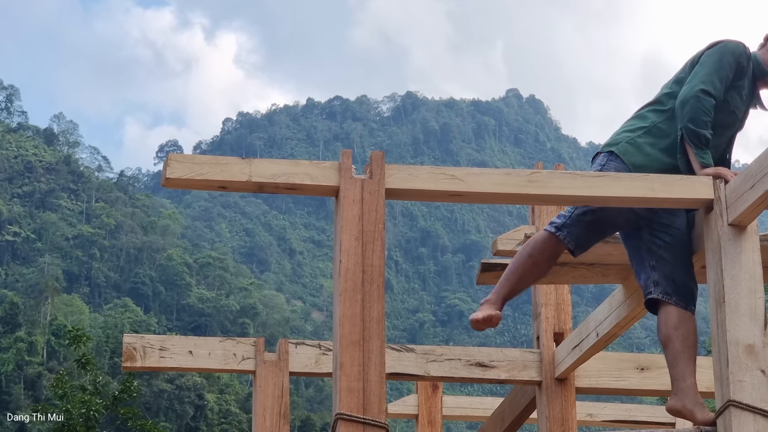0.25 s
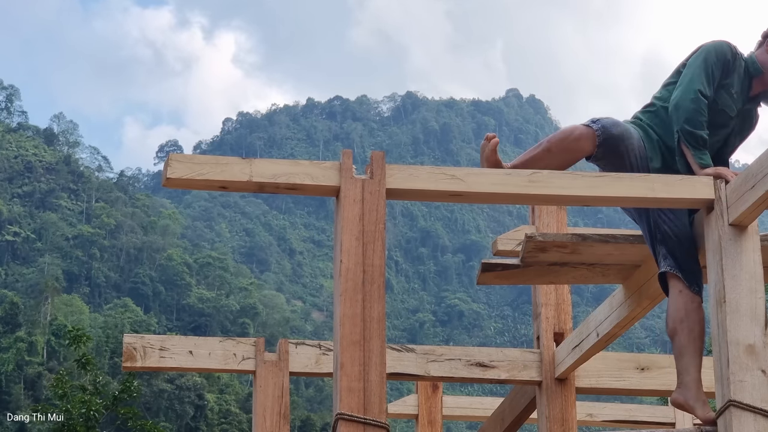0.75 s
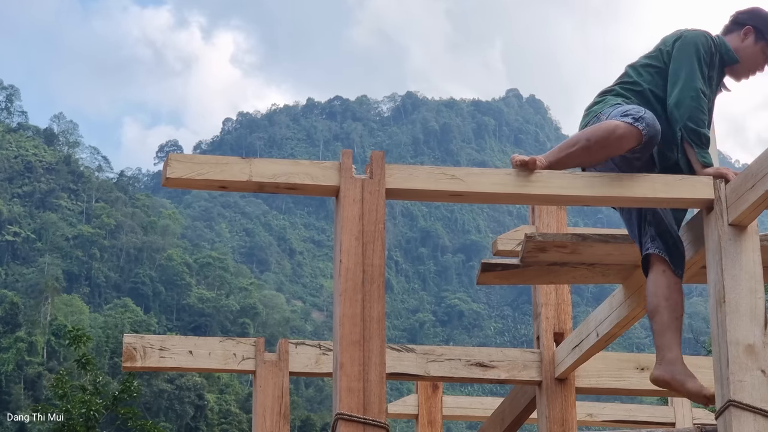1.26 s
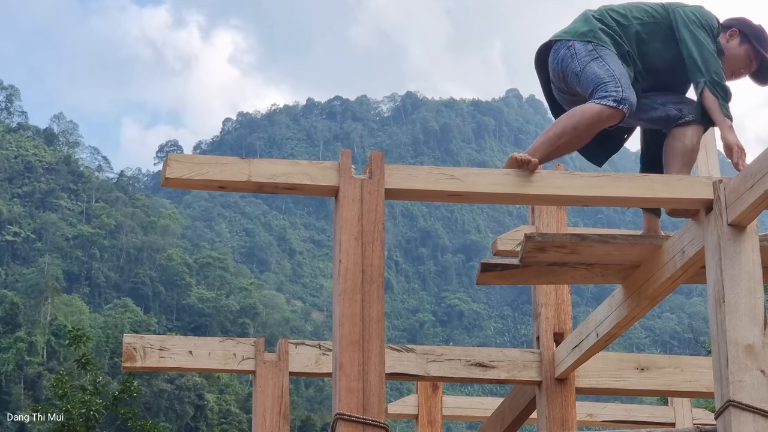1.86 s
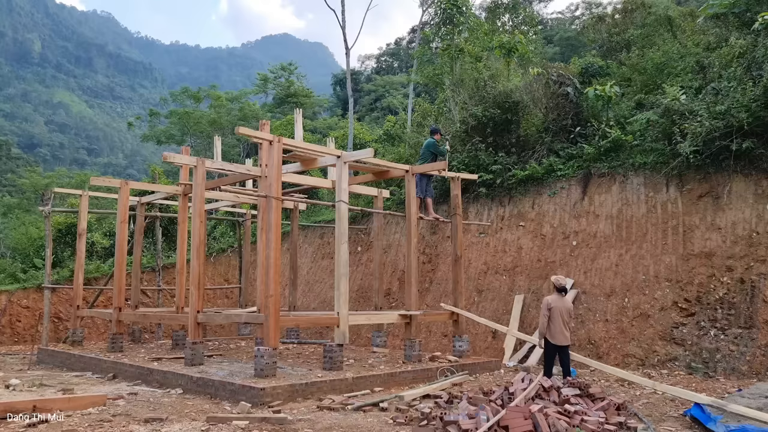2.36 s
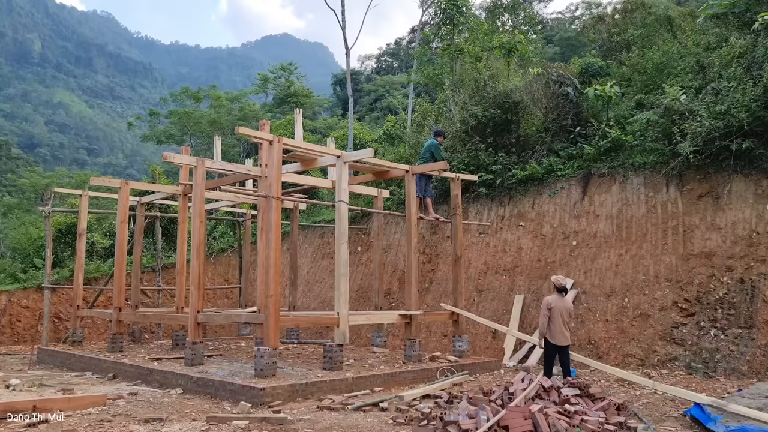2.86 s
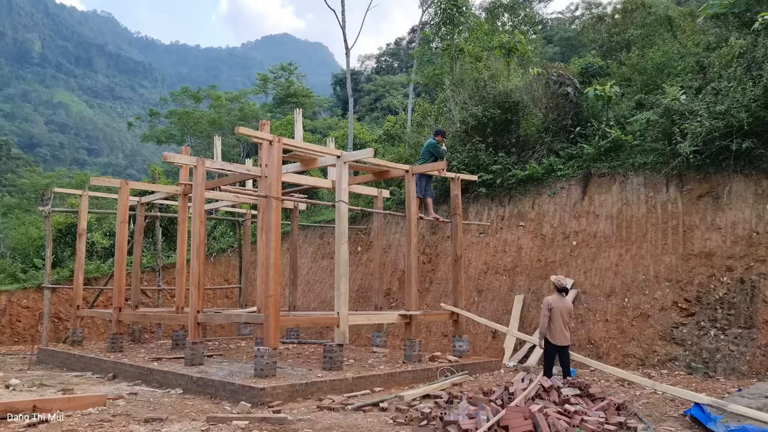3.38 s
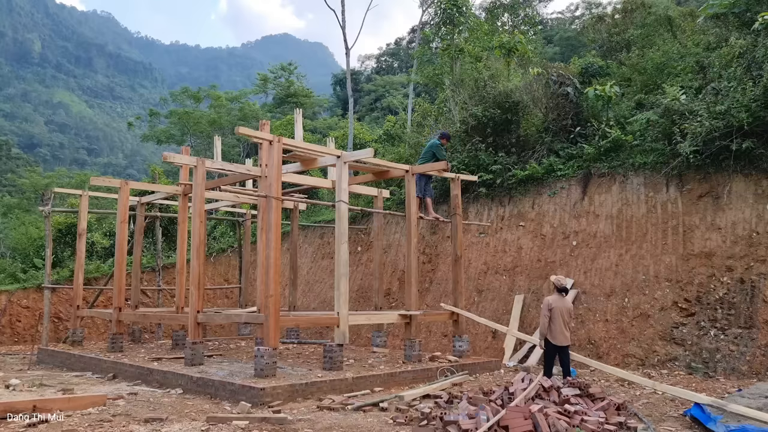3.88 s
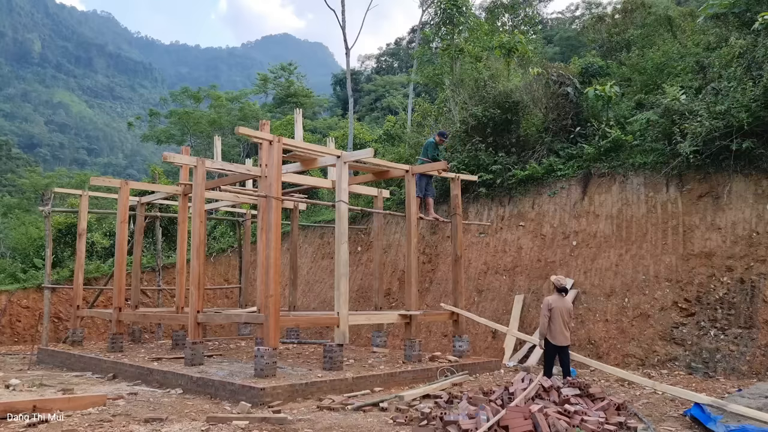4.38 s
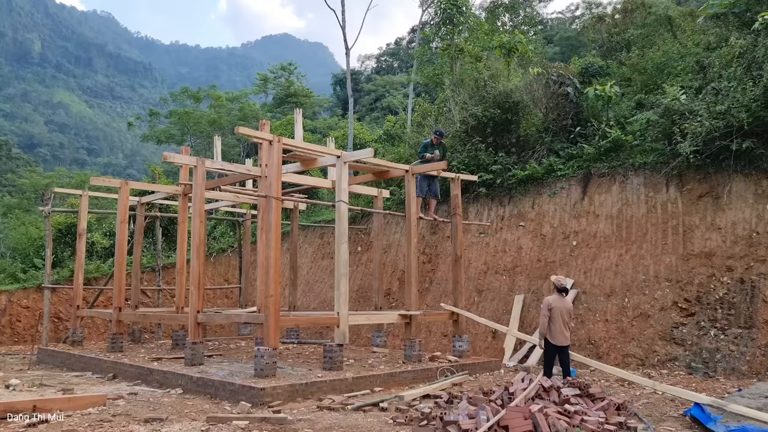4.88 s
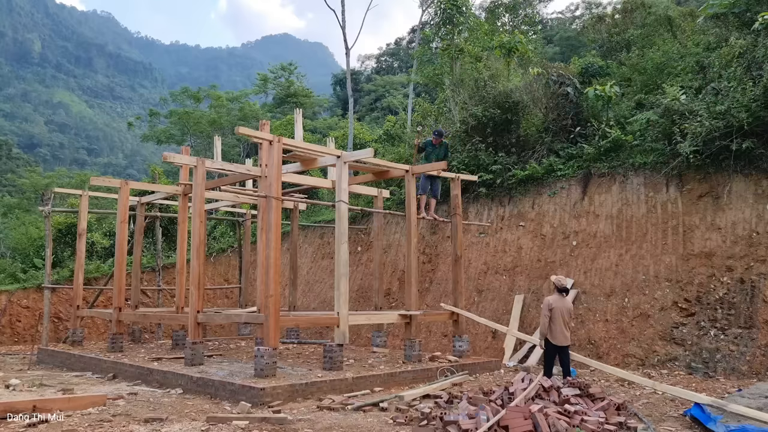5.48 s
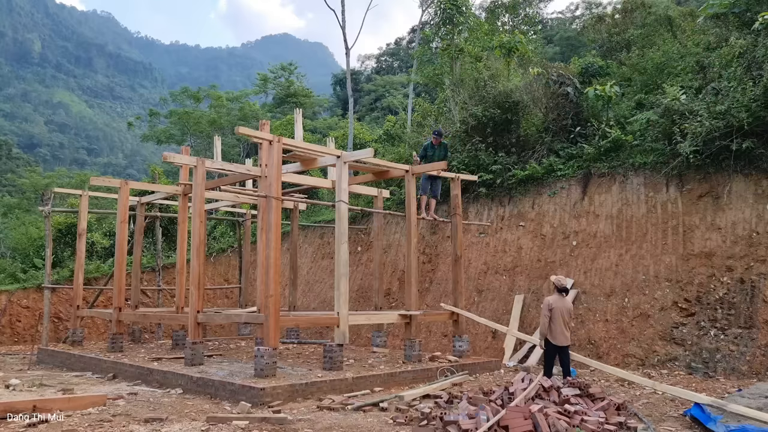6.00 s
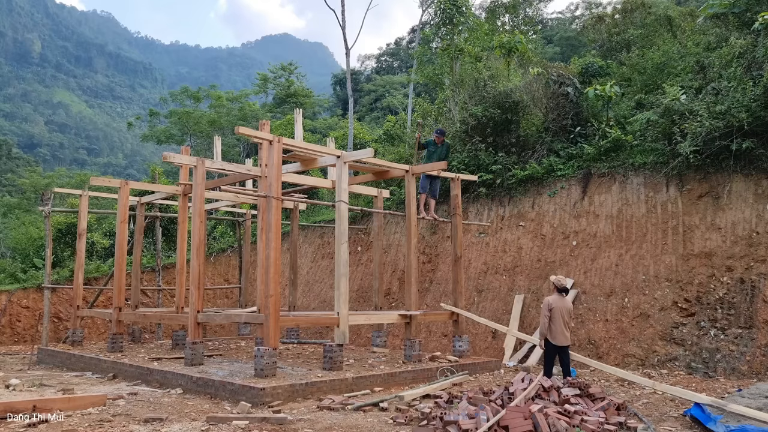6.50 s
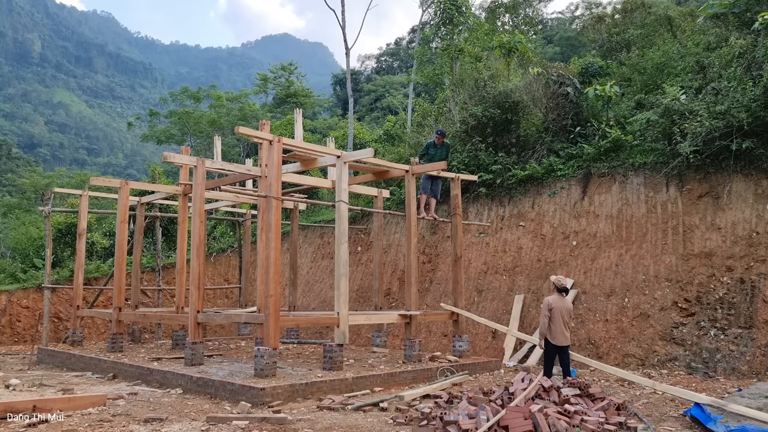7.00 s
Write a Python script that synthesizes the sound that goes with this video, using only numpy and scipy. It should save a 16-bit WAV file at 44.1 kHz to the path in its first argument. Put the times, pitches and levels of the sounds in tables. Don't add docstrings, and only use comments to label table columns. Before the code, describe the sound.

Insect drone and soft wood creaks, a quick dip to silence, then four spaced, woody hammer blows with little rebounds and a short outdoor slap.

```python
import sys
import numpy as np
from scipy import signal
from scipy.io import wavfile
from scipy.ndimage import uniform_filter1d

SR = 44100
rng = np.random.default_rng(int(sys.argv[2]) if len(sys.argv) > 2 else 0)


def file_out(sig):
    cols = np.atleast_2d(sig).T
    lim = np.clip(cols, -1, 1)
    pcm = np.round(lim * 32767).astype(np.int16)
    wavfile.write(sys.argv[1], SR, pcm)


def voltage_ratio(level):
    return 10 ** (np.asarray(level, float) / 20)


N = 319719
CUT_S = 2.18


def in_time(rows):
    s, *columns = np.transpose(rows)
    return [np.interp(np.arange(N) / SR, s, c) for c in columns]


def at_hz(points, hz, order=1):
    return np.interp(np.log(hz), np.log(np.array(points)[:, 0]), np.array(points)[:, order])


def by_take(first, second):
    return np.where(np.arange(N) < CUT_S * SR, first, second)


def take_time():
    return np.arange(N) / SR - by_take(0, CUT_S)


def drift(rate, count=1):
    r = np.exp(-64 * np.pi * rate / SR)
    noise = rng.standard_normal((count, N // 32 + 2002))
    slow = signal.lfilter([1], [1, -2 * r, r * r], noise)[:, 2000:]
    return slow / slow.std(axis=1, keepdims=True)


def clicks(seconds, sizes):
    out = np.full(N, 1e-18)
    out[np.round(np.asarray(seconds) * SR).astype(int)] = sizes
    return out


def ring(x, hz, t60):
    r, w = voltage_ratio(-60 / (t60 * SR)), 2 * np.pi * hz / SR
    return signal.lfilter([0, np.sin(w)], [1, -2 * r * np.cos(w), r * r], x)


def swell(x, rise, t60):
    a = np.exp(-1 / (max(rise, 1e-4) * SR))
    return signal.lfilter([(1 - a) ** 2], np.poly([a, a, voltage_ratio(-60 / (t60 * SR))]), x)


def band(x, order, low_hz, high_hz):
    return signal.sosfilt(signal.butter(order, [low_hz, high_hz], "band", fs=SR, output="sos"), x)


def highpass(x, order, hz):
    return signal.sosfilt(signal.butter(order, hz, "high", fs=SR, output="sos"), x)


# start in seconds, peak in dB,
# beam ring in dB, slap delay in seconds, slap loss in dB.
BLOWS = [
    (2.686, 2, 0, 0.029, 21),
    (3.881, 1, -0.7, 0.031, 13),
    (5.758, 1.5, -1, 0.038, 25),
    (6.953, 1, 1.2, 0.036, 22.5),
]
# crack, sizzle, thump, echo and beam ring, all in dB.
BLOW_COLOUR = [
    (-24, -35.5, -25, 0.1, -1.5),
    (-21.5, -24, -25.5, -8, -8),
]
# start in seconds, peak, crack, thump and echo in dB.
REBOUNDS = [(2.704, -17.5, -26, -25, -12.5), (2.742, -23, -28.5, -25, -21),
            (3.905, -16.5, -20.5, -27.5, -7), (3.936, -15, -29, -20, -8), (4.146, -48, -30, -29, 8),
            (5.78, -17, -18.5, -24.5, -9.5), (6.974, -15, -17, -20, -2), (7.018, -21, -29, -23, -11),
            (6.21, -63, -30, -8, 6), (2.872, -45.5, -9, -6, 16), (2.995, -57, -17, -45, 16),
            (4.08, -23.5, -50, -6, 1.5), (4.103, -33.5, -38, -22.5, -12), (5.692, -31.5, -21.5, -62, 14.5),
            (5.706, -32.5, -31, -64, 1.5), (5.815, -21, -38, -16, 1), (5.869, -20.5, -69, -15, 13.5),
            (6.071, -41, -13, -20, 12.5), (7.092, -25, -26, -10, 8), (7.137, -43, -10, -17, -1),
            (4.215, -49, -30, -31, -14)]


def contacts():
    *blow_colour, blow_ring_db = BLOW_COLOUR[0]
    rows = [(s, db, *blow_colour, blow_ring_db + ring_db) for s, db, ring_db, _, _ in BLOWS]
    rows += [(s + lag, db - loss_db, *BLOW_COLOUR[1]) for s, db, _, lag, loss_db in BLOWS]
    for s, db, crack_db, thump_db, echo_db in REBOUNDS:
        sizzle_db = -22 + 0.38 * crack_db
        rows.append((s, db, crack_db, sizzle_db, thump_db, echo_db, 0))
    return np.transpose(sorted(rows))


BEAM_S = [2.7, 3.9, 5.75, 6.95]
# frequency in Hz, level in dB, t60 in seconds.
BEAMS = [
    [(372, -12, .15), (448, 1, 0.11), (537, 4.5, 0.047), (634, -10.5, .12), (757, -6.5, 0.09),
     (856, -2, 0.07), (1038, -16.5, 0.061), (1057, -9.5, 0.067), (1172, -8, 0.046), (1388, -7, .07),
     (1431, -19, .09), (1580, -19.5, 0.11), (1900, -20, 0.13)],
    [(406, 2.5, 0.12), (492, 0.5, 0.044), (590, 1, 0.091), (684, -8.5, .1), (818, -8, 0.13),
     (867, -7, 0.17), (982, -7, 0.125), (1150, -2.5, 0.12), (1280, -15, .1), (1350, -13, .1),
     (1664, -19, .1), (1780, -19.5, .1), (2000, -19.5, 0.11)],
    [(394, -5.5, .09), (476, -1, 0.092), (529, -0.5, 0.11), (732, -6.5, 0.1), (793, 4, .07), (860, 0, 0.1),
     (980, -3.5, 0.11), (1092, -6, 0.057), (1150, -13.5, 0.07), (1305, -9, .1), (1378, -8, 0.14),
     (1701, -13, .1), (1900, -16, .08)],
    [(375, -0.5, 0.053), (428, -12, 0.1), (477, -4, 0.077), (533, -6, 0.13), (740, -5.5, 0.1),
     (873, -8, 0.16), (869, -4.5, 0.13), (1038, -1.5, 0.11), (1126, -3, 0.092), (1333, -7, .08),
     (1434, -14.5, 0.17), (1580, -25, .1), (1800, -22, 0.122)],
]
SOFT_DULL_DB = 5
LOW_MODES_LATE_S = .002
CREST_S, CREST_SCATTER = .003, .3


def beams():
    out = np.zeros((2, N))
    s, peak_db, ring_db = contacts()[[0, 1, 6]]
    beam = np.abs(s[:, None] - BEAM_S).argmin(axis=1)
    for k, modes in enumerate(BEAMS):
        part = slice(int((BEAM_S[k] - .1) * SR), int((BEAM_S[k] + .6) * SR))
        height = voltage_ratio(peak_db + ring_db) * (beam == k)
        hard = swell(clicks(s - .006, height * (peak_db > -9))[part], 0.0012, 0.01)
        soft = swell(clicks(s - .006, height * (peak_db <= -9))[part], 0.0012, 0.01)
        seconds = np.arange(part.start, part.start + len(hard)) / SR
        for hz, level_db, t60 in modes:
            push = hard + soft * voltage_ratio(-SOFT_DULL_DB * np.log2(hz / 450))
            push = np.roll(push, int(LOW_MODES_LATE_S * SR * 450 / hz))
            cycles = hz * (seconds - BLOWS[k][0] - CREST_S) + CREST_SCATTER * rng.random()
            apart = (hz + 500) / 1500 * rng.choice([-1, 1]) * np.array([[.5], [-.5]])
            driven = push * np.cos(2 * np.pi * cycles + apart)
            out[:, part] += voltage_ratio(level_db - 42.5) * ring(driven, hz, 0.87 * min(t60, .3))
    return out


# start in seconds, peak in dB.
SNAPS = [
    (2.684, -18.5),
    (3.8797, -25.5),
    (3.9175, -31.5),
    (5.7537, -23),
    (6.9525, -27.5),
]
# frequency in Hz, level in dB, t60 in seconds.
SNAP_MODES = [
    [(2633, -6.5, 0.036), (2890, -2, 0.026), (3451, -10, .04), (3650, -2.5, .02), (5820, -13, .02),
     (6821, -13, 0.025)],
    [(2610, -5.5, .05), (3155, -8, .03), (3483, -6, .04), (5200, -6, .03), (5615, -12, .03),
     (6277, -12, .03)],
    [(2300, -5, .03), (2800, -3, .03), (3500, -6.5, .02), (4400, -6, .02), (6100, -3, 0.021),
     (7800, -7, .015)],
    [(1873, 7, .04), (2180, -0.5, .05), (2492, 0.5, .04), (2955, -7, .04), (4200, -9, .02),
     (5679, -2, .015)],
    [(2100, -1, .05), (2365, 6.5, 0.073), (2810, 0, 0.054), (3241, -8, .04), (3967, -7, 0.036),
     (4926, -3.5, .025), (6350, -14, .02)],
]
SNAP_SPREAD_S = .005


def snaps():
    out, size = np.zeros((2, N)), SR // 8
    for (s, db), modes in zip(SNAPS, SNAP_MODES):
        i, draw = int(s * SR), rng.random((len(modes), 3, 4))
        for (hz, level_db, t60), (when, strength, lag) in zip(modes, draw):
            hit = np.full((2, size), 1e-18)
            late = (SNAP_SPREAD_S * SR * (when + np.arange(4)) / 4).astype(int)
            for ear in range(2):
                hit[ear, late + int(8 * lag[ear])] = (.5 + strength) * 1.2 ** np.arange(4)
            sound = band(ring(hit, hz, t60), 1, hz / 0.99, hz * 2.4)
            out[:, i:i + size] += voltage_ratio(db + level_db - 4.5) * sound
    return out


EDGES_HZ = np.r_[np.geomspace(30, 4000, 25), np.arange(4600, 10001, 600), 11500, 13000, 14500, 16000]
CENTRES_HZ, WIDTHS_HZ = np.sqrt(EDGES_HZ[1:] * EDGES_HZ[:-1]), np.diff(EDGES_HZ)


def share(points):
    power = WIDTHS_HZ * voltage_ratio(2 * at_hz(points, CENTRES_HZ))
    return power / np.sum(power)


# frequency in Hz, level in dB per Hz.
KNOCK = [(21, -50), (35, -16.5), (244, -28.5), (418, 4), (646, -13), (878, -5.5), (1130, -9), (1260, -17),
         (1390, -7.5), (2260, -28.5), (2850, -30), (4400, -40), (9470, -35), (14600, -40.5), (15800, -45)]
# frequency in Hz, level in dB per Hz.
ECHO = [(21, -36), (35, -13.5), (102, -5), (257, -11), (475, -1.5), (598, -5), (856, -6), (1260, -11),
        (1390, -11), (1620, -19.5), (2320, -28.5), (4870, -29), (5830, -31.5), (7150, -31.5), (15800, -43)]
# frequency in Hz, burst t60 in seconds, echo t60 in seconds, rise in seconds,
# left-right likeness of the burst, likeness of the echo.
DYING = [(39.7, 0.1, 0.51, 0.021, 1, 0.93), (130, 0.2, 0.32, 0.0037, 1, 1),
         (400, 0.062, 0.39, 0.0013, 0.97, 0.83), (900, 0.11, 0.32, 0.00016, 0.93, -0.65),
         (2000, 0.073, 0.49, 0.0021, 0.44, -0.062), (5070, 0.077, 0.27, 0.0011, 0.43, -0.66),
         (15010, 0.09, 0.18, 0.0024, 0.099, -0.7)]
ECHO_GRAIN_DB, ECHO_GRAIN_S = 1.5, .006


def echo_lumps(noise):
    lumps = uniform_filter1d(uniform_filter1d(noise, size=int(ECHO_GRAIN_S * SR)), size=64)
    return voltage_ratio(ECHO_GRAIN_DB * lumps / lumps.std())


def knock_colour(hz, peak_db, crack_db, sizzle_db, thump_db):
    if hz < 230:
        return thump_db + 29.5
    if hz < 1150:
        return 0
    if hz < 2200:
        return 0.28 * peak_db
    return crack_db + 30.5 if hz < 6000 else sizzle_db + 35.0


def knock(hz, lumps):
    s, peak_db, crack_db, sizzle_db, thump_db, echo_db, _ = contacts()
    burst_t60, echo_t60, rise = (at_hz(DYING, hz, order=c) for c in (1, 2, 3))
    colour_db = knock_colour(hz, peak_db, crack_db, sizzle_db, thump_db)
    burst_chance, echo_chance = rng.standard_normal((2, len(s)))
    burst_db = peak_db + colour_db - 14.0 + 3.4 * burst_chance
    burst = swell(clicks(s - .005, voltage_ratio(burst_db)), rise, burst_t60)
    burst[:-170] += voltage_ratio(-21.5) * (500 < hz < 2500) * burst[170:]
    answer_db = peak_db + 0.27 * colour_db + echo_db - 26.5 + 2.7 * echo_chance
    echo = swell(clicks(s, voltage_ratio(answer_db)), 0.003, echo_t60)
    return burst, echo * (lumps if hz > 230 else 1)


# start in seconds, peak in dB, brightness in dB, length in seconds.
CREAKS = [(0.339, -52.5, 3.5, 0.045), (0.403, -55.5, -1, 0.048), (0.465, -64, 9, 0.047),
          (0.747, -58, 8.5, 0.039), (1.213, -58, 5.5, 0.056), (1.248, -56, -22, 0.046),
          (1.409, -54, -0.5, 0.03), (1.454, -49, 4, 0.043), (1.638, -51, 5.5, 0.035),
          (1.688, -48.5, 3, 0.065), (1.752, -53.5, 0.5, 0.057), (1.763, -58, 10.5, 0.039),
          (1.826, -53.5, 4.5, 0.043)]
# frequency in Hz, width in Hz, level in dB.
JOINT = [(239, 23, -2), (353, 90, 7.5), (547, 48, 3), (684, 96, -5), (870, 120, -2), (1005, 100, -0.5),
         (1130, 69, -2.5), (1300, 120, 1.5), (1545, 56, -9), (1710, 250, -26)]
CREAK_RISE_S = 0.0036


def creaks():
    n, out = round(CUT_S * SR), np.zeros((2, N))
    slips = (rng.random(n) < 900 / SR) * rng.standard_normal(n)
    low, high = np.full((2, n), 1e-18)
    for s, db, bright_db, length in CREAKS:
        i, size = int(s * SR), int(abs(length) * SR) + 2
        t = np.arange(2 * size)
        part = slice(i, i + 2 * size)
        envelope = np.exp(-(t / size) ** 3) * np.minimum(t / (CREAK_RISE_S * SR), 1)
        run = voltage_ratio(db) * envelope * slips[part]
        low[part] += run
        high[part] += voltage_ratio(bright_db) * run
    for hz, width_hz, level_db in JOINT:
        sound = voltage_ratio(level_db - 18.0) * ring(low if hz < 750 else high, hz, 3.55 / width_hz)
        out[:, :n] += [sound, np.roll(sound, int(hz / 300 * rng.normal()))]
    return highpass(out, 6, 200)


# time in seconds, level in dB, pitch in Hz.
GROAN = [(.76, -95, 374), (.82, -61.5, 314), (.88, -70, 372), (.93, -81, 370), (.98, -67, 352),
         (1.07, -69.5, 299), (1.15, -70, 334), (1.21, -90, 312)]


def groan():
    n = 2 * SR
    level_db, hz = np.array(in_time(GROAN))[:, :n]
    rough = drift(28)[0].repeat(32)[:n]
    turn = 2 * np.pi * np.cumsum(hz * (1 + 0.027 * rough)) / SR
    return np.pad(voltage_ratio(level_db + 3.4 * rough) * np.sin(turn), (0, N - n))


# start in seconds, peak in dB, low edge in Hz, high edge in Hz,
# t60 in seconds.
TICKS = [(1.975, -51.5, 424, 1490, 0.045), (2.87, -43, 1300, 1440, 0.044), (3.0, -51, 683, 1020, 0.17),
         (4.543, -55.5, 750, 1300, 0.016), (4.696, -55.5, 419, 705, 0.046), (1.226, -51, 1150, 1680, 0.055),
         (1.991, -61, 150, 900, 0.28), (4.845, -62.5, 750, 1100, 0.026), (4.774, -52.5, 1300, 1870, 0.076),
         (4.813, -47.5, 750, 1620, 0.049), (5.299, -50.5, 710, 2300, 0.0093),
         (6.778, -46, 1071, 2333, 0.0081)]


def ticks():
    out, noise = np.zeros(N), rng.standard_normal(N)
    for s, db, low_hz, high_hz, t60 in TICKS:
        part = slice(int(s * SR) - 200, int(s * SR) + SR // 4)
        puff = noise[part] * swell(clicks([s - .002], voltage_ratio(db + 13.5))[part], 0.00075, t60)
        out[part] += band(puff, 2, low_hz, high_hz)
    return out


# time in seconds, level in dB, half lines in dB,
# lowest resonance in Hz, its level in dB.
SONG = [(0, -53, -38, 3040, 7.5), (.25, -56.5, -6.5, 3500, 11), (.55, -53.5, -17, 3220, -3.5),
        (.9, -55, -12, 2800, 14), (1.15, -53, -5, 2660, 2), (1.3, -53, -6, 2800, 20.5),
        (1.5, -50, -17, 2770, 4.5), (1.75, -52.5, -9, 2860, 15.5), (1.9, -57.5, -1, 3060, 19.5),
        (2.1, -56, -0.5, 3090, 7.5), (2.2, -62.5, 4, 2910, 13), (2.65, -60.5, 2.5, 2980, 10),
        (3.0, -68, 3, 2947, 13), (3.35, -69, 7.5, 2870, 8.5), (3.65, -71.5, 11.5, 2840, 2),
        (4.1, -70.5, 6.5, 2860, 8.5), (4.5, -69, 4.5, 2930, 1), (5.2, -79, 6.5, 2870, -4),
        (5.6, -90, 15, 2870, 8.5)]
# first Hz, last Hz, first dB, last dB,
# settling time in seconds.
UPPER = [
    [(4220, 4200, 15, 10, 0.28), (5460, 4790, 17.5, 1.5, 0.43), (5060, 5090, 13.5, -1, .5),
     (3860, 4800, -3, 2, 1)],
    [(3240, 3200, 10, 8, 0.8), (4690, 4800, 6, 3.5, 1), (4504, 4300, 6.5, 4, 0.74),
     (5750, 6000, -5, -10, 1)],
]
JITTER_START, JITTER_DOUBLES_S = 0.047, (0.71, 0.65)


def song():
    level_db, half_db, *peaks = in_time(SONG)
    for early, late in zip(*UPPER):
        first_hz, last_hz, first_db, last_db, settle = map(by_take, early, late)
        left = np.exp(-take_time() / settle)
        peaks += [last_hz + (first_hz - last_hz) * left, last_db + (first_db - last_db) * left]
    jitter = JITTER_START * 2 ** (take_time() / by_take(*JITTER_DOUBLES_S))
    return np.array([level_db, half_db, jitter, *peaks])


# time in seconds, pulse-pair rate in Hz.
PAIR_RATE = [(0, 148.4), (.4, 148.7), (.9, 149.55), (1.1, 149.8), (1.3, 150.08), (1.5, 150.27),
             (1.7, 150.2), (1.9, 149.5), (2.17, 149), (2.18, 142.6), (2.5, 142.72), (3.06, 142.5),
             (3.26, 141.4), (3.46, 139.65), (3.66, 138.3), (3.86, 136.7), (4.06, 136.1), (5.5, 130)]
# frequency in Hz, level in dB.
BODY = [(1500, -23.5), (2300, -18.5), (2800, -0.5), (4000, -1.5), (5500, 1.5), (6000, -7), (6600, -15.5)]
# time in seconds, swap in dB.
TOP_SWAP = [(0, -1), (.4, -4), (.75, -2), (1.1, -2), (1.4, 4), (1.9, 3), (2.2, 6), (3, 4), (3.5, 2)]
SWAP_FROM_HZ, SWAP_FULL_HZ = 3900, 5400
FAVOUR_DB = [
    [0, 0, 0, 5.6, -5, 2.2, 0.9, 2, -6.5, 0, 6.2, 3.5, 0.58, 2.5, 1, -3, 0.91, -3, 6, 2, 1, 2, 1, -1, 0.89,
     1, 1, -8, -6, 0, 8, -5, 0, 0, 0],
    [0, 0.0015, 0.0024, 4.4, 3, 6, 5, 3, 1, 1, 1, 2, 2, 1.8, 4.5, 4.5, 5, 1.5, 2.5, -3, 1, -3.5, 0, 1, 3,
     3.5, 4, 0, 3.5, 0.00093, 0, 0.5, 2, 0, 2],
]
SHIMMER, SHIMMER_HZ = 1.7, 14


def cicada():
    n = int(5.6 * SR) // 32 * 32
    rate_hz = in_time(PAIR_RATE)[0][:n]
    level_db, half_db, jitter, *peaks = song()[:, :n:32]
    steps = len(jitter)
    wobble = np.interp(np.arange(n) / 32, np.arange(steps), jitter * drift(24)[0, :steps])
    turn = 2 * np.pi * np.cumsum(rate_hz) / SR + 0.085 * wobble
    out, spin = np.zeros((2, N)), np.exp(1j * turn)
    partial = spin ** 10
    side = by_take(0.93, -1)[:n:32]
    swap = in_time(TOP_SWAP)[0][:n:32]
    shimmer = np.minimum(SHIMMER * jitter, 1.2)
    for k in range(11, 46):
        partial = partial * spin
        hz = k * rate_hz[::32]
        top_db = sum(db / (1 + ((hz - at) / 140) ** 2) for at, db in zip(peaks[::2], peaks[1::2]))
        top_db = top_db + np.where(side > 0, FAVOUR_DB[0][k - 11], FAVOUR_DB[1][k - 11])
        upward = np.clip((hz - SWAP_FROM_HZ) / (SWAP_FULL_HZ - SWAP_FROM_HZ), 0, 1)
        swap_db = swap * (k % 2 - .5) * 2 * upward
        both, left, right = drift(8, count=3)[:, :steps]
        waver_db = 2.0 * both + 1.4 * np.array([left, right])
        line = voltage_ratio(level_db + at_hz(BODY, hz) + top_db + half_db * (k % 2) + swap_db + waver_db - 8.0)
        loose = shimmer * drift(SHIMMER_HZ, count=2)[:, :steps]
        line = line * (1 + loose[0] + 1j * loose[1]) / np.sqrt(1 + 2 * shimmer ** 2)
        lag = 2 * np.pi * k * 149 * 1.1 / SR * np.array([[-1], [1]]) * side
        phase = lag + rng.normal(0, 1.2) + rng.normal(0, .2, (2, 1))
        tone = (line * np.exp(1j * phase))[:, :, None] * partial.reshape(-1, 32)
        out[:, :n] += tone.imag.reshape(2, n)
    return out


# frequency in Hz, width in Hz, level in dB.
RASPER = [(2320, 270, -2), (2660, 18, -6.5), (2850, 190, -1.5), (3690, 28, -2.5), (4450, 37, 0),
          (4780, 130, -0.5), (5000, 88, -2)]
# time in seconds, level in dB.
RASP = [(3.0, -76), (3.4, -65), (4.1, -59.5), (4.8, -60), (5.5, -58.5), (5.9, -65.5), (6.5, -65),
        (7.25, -64)]
THROB_HZ, THROB_DEPTH = 20.6, .4


def rasper():
    start = 3 * SR
    noise = rng.standard_normal((2, N - start))
    wander = drift(3).repeat(32)[:N - start]
    body = 0
    for hz, width_hz, db in RASPER:
        body = body + voltage_ratio(db) * np.sqrt(width_hz) * ring(noise, hz, 2.2 / max(width_hz, 50))
    body = highpass(body, 6, 2000)
    throb = 1 + THROB_DEPTH * np.sin(np.cumsum(2 * np.pi * THROB_HZ / SR * (1 + 0.08 * wander)))
    sound = body / body.std() * throb * voltage_ratio(in_time(RASP)[0][start:])
    return np.pad(sound, ((0, 0), (start, 0)))


# time in seconds, murmur in dB.
BREEZE = [(0, -68), (.55, -71.5), (.93, -67.5), (1.53, -71), (1.86, -67.5), (2.1, -70), (2.3, -88.5),
          (2.66, -78.5), (3.25, -72), (3.55, -69), (3.8, -75), (4.5, -69.5), (5.3, -74.5), (5.66, -76.5),
          (6.35, -72.5), (6.5, -69), (6.9, -72.5)]
# wind rumble in dB, far chorus in dB, its change in dB per second, high hiss in dB,
# its change in dB per second.
TAKES = [
    (-76.5, -57, 0.1, -48.5, -0.3),
    (-89, -52.5, -1.57, -54, -0.4),
]
RUMBLE_FOLLOWS = .3


def air():
    murmur, = in_time(BREEZE)
    rumble, chorus, chorus_slope, hiss, hiss_slope = map(by_take, *TAKES)
    rumble = rumble + RUMBLE_FOLLOWS * (murmur - murmur.mean())
    t = take_time()
    return np.array([rumble, murmur, chorus + chorus_slope * t, hiss + hiss_slope * t])


# frequency in Hz, level in dB per Hz.
RUMBLE = [(25, 10), (60, -1), (130, -4.5), (200, -19), (400, -66.5)]
# frequency in Hz, level in dB per Hz.
MURMUR = [
    [(110, -54), (180, -25), (345, -5), (442, -9), (512, 5), (571, -10.5), (838, -14.5), (1620, -17),
     (1900, -7), (2470, -39), (4180, -120)],
    [(110, -36.5), (180, -15.5), (298, -12), (404, 0.5), (624, 0), (681, -5), (830, -1.5), (1480, -13.5),
     (1900, -2), (2470, -32.5), (4180, -120)],
]
# frequency in Hz, level in dB per Hz.
CHORUS = [(940, -39.5), (1600, -33.5), (1960, -16.5), (2270, 20.5), (2550, -32), (2900, -4), (3890, 0),
          (4680, -4.5), (5650, -12), (6300, -11), (8190, -40.5), (13900, -120)]
CHORUS_LATE = [(1500, -34.5), (1950, -15.5), (2300, 1), (2540, -11), (2850, -1), (3300, -2.5), (3700, -6.5),
               (4250, -2.5), (4700, -4), (5300, -5), (5700, -15), (6300, -10), (8190, -42), (13900, -120)]
# frequency in Hz, level in dB per Hz.
HISS = [(3410, -37.5), (5800, -7), (6000, -13), (6070, -15.5), (6800, 4.5), (7240, 3.5), (7940, -5.5),
        (8600, -6.5), (9080, -17.5), (10400, -12.5), (11800, -37.5), (14900, -10), (15800, -25.5)]


def valley():
    rumble, murmur, chorus, hiss = voltage_ratio(2 * air())
    early = np.arange(N) < CUT_S * SR
    power = np.array([rumble, murmur * early, murmur * ~early, chorus * early, chorus * ~early, hiss])
    shares = np.transpose([share(points) for points in [RUMBLE, *MURMUR, CHORUS, CHORUS_LATE, HISS]])
    return shares, power


# frequency in Hz, left-right likeness.
AIR_ALIKE = [(60, 0.38), (180, 0.32), (550, -0.18), (1650, -0.0058), (4970, -0.071), (15000, -0.19)]
# frequency in Hz, left minus right in dB.
AIR_LEFT = [(60, 1.5), (150, -0.5), (380, 1), (950, 0), (2380, 1), (5980, 3.5), (15000, -3)]


def knocks_and_valley():
    air_share, air_power = valley()
    knock_share, echo_share = share(KNOCK), share(ECHO)
    white, together, out = rng.standard_normal((2, 2, N)), drift(4.3)[0], 0
    lumps = echo_lumps(white[1, 1, ::-1])
    for k, hz in enumerate(CENTRES_HZ):
        noise = band(white[k % 2], 2, EDGES_HZ[k], EDGES_HZ[k + 1])
        mid, side = noise / np.sqrt(1.754 * WIDTHS_HZ[k] / SR)
        burst, echo = knock(hz, lumps)
        powers = np.array([air_share[k] @ air_power, knock_share[k] * burst ** 2, echo_share[k] * echo ** 2])
        alike = [at_hz(AIR_ALIKE, hz), at_hz(DYING, hz, order=4), at_hz(DYING, hz, order=5)]
        alike = np.clip(alike, -1, 1)
        common = np.sqrt((1 + alike) @ powers / 2) * mid
        opposed = np.sqrt((1 - alike) @ powers / 2) * side * [[1], [-1]]
        flicker_db = (0.37 * together + 1.5 * drift(10)[0]) * (1 if hz < 2000 else .4)
        lean = voltage_ratio(at_hz(AIR_LEFT, hz) * np.array([[.5], [-.5]]))
        out = out + voltage_ratio(flicker_db).repeat(32)[:N] * (common + opposed) * lean
    return out


def scene():
    hammer = beams() + snaps()
    timber = creaks() + groan() + ticks()
    insects = cicada() + rasper()
    return hammer + timber + insects + knocks_and_valley()


FADE_START_S, FADE_END_S, FADE_BEND = 1.966, 2.134, 1.11
RETURN_S, RETURN_DIP_DB, RETURN_RISE_S = 2.216, -10, .03


def fade():
    t = np.arange(N) / SR
    out = np.clip((FADE_END_S - t) / (FADE_END_S - FADE_START_S), 0, 1) ** FADE_BEND
    since = np.maximum(t - RETURN_S, 0)
    back = (t > RETURN_S) * voltage_ratio(RETURN_DIP_DB * np.exp(-since / RETURN_RISE_S))
    return voltage_ratio(by_take(0.5, 2.5)) * (out + back)


SPARSE_FROM_HZ, LINES_DB, LINES_LAST_S, HOLES_BELOW = 8900, 9, .07, -1.3


def thinned(x):
    hz, _, z = signal.stft(x, SR, nperseg=1024)
    frames = max(int(LINES_LAST_S * SR / 512), 1)
    chance = rng.standard_normal((2, *z.shape[1:]))
    fine, coarse = uniform_filter1d(chance, size=frames) * np.sqrt(frames)
    coarse = uniform_filter1d(coarse, size=7, axis=0) * np.sqrt(7)
    lines = voltage_ratio(LINES_DB * np.minimum(fine, 1))
    gain = lines * np.clip((coarse - HOLES_BELOW) * 3.0, 0, 1)
    high = hz > SPARSE_FROM_HZ
    power = np.mean(np.abs(z[:, high]) ** 2, axis=(0, 1))
    quiet = power < 4 * np.median(power)
    z *= np.where(high[:, None] & quiet, gain / np.sqrt(np.mean(gain ** 2)), 1)
    return signal.istft(z, SR, nperseg=1024)[1][:, :N]


def low_pass(x):
    return signal.sosfilt(signal.butter(12, 16640, fs=SR, output="sos"), x)


def record(dry):
    x = highpass(dry, 4, 50)
    x = 1.054 * np.tanh(x / 1.143) * fade()
    x = signal.sosfilt(signal.cheby2(22, 60, 15850, fs=SR, output="sos"), x)
    mix = thinned(x)
    return low_pass(mix)


dry = scene()
out = record(dry)
file_out(out)
```